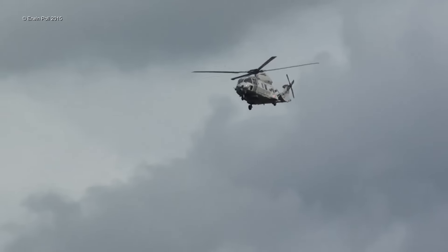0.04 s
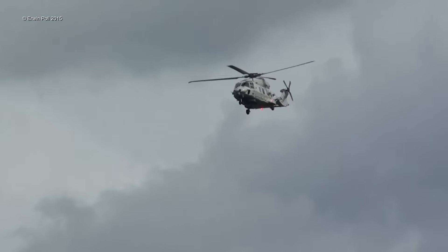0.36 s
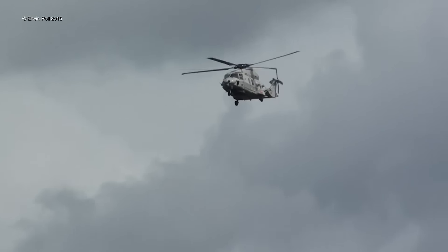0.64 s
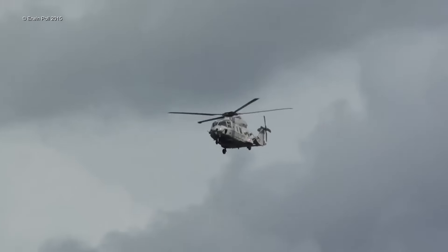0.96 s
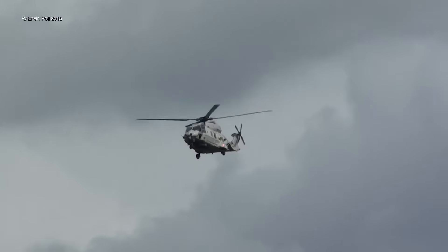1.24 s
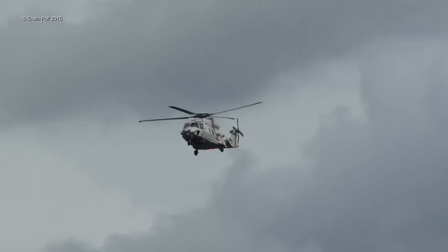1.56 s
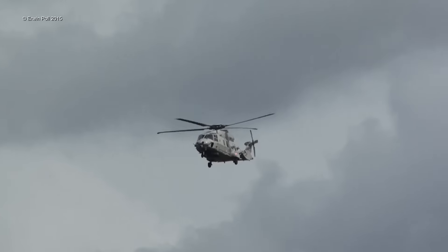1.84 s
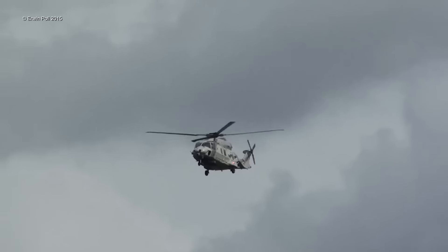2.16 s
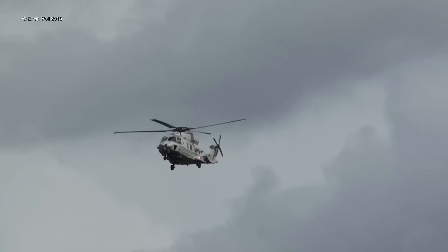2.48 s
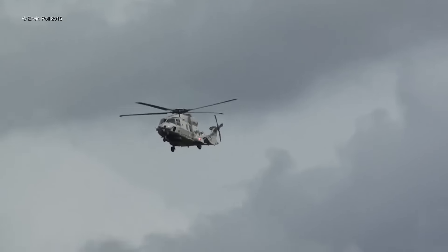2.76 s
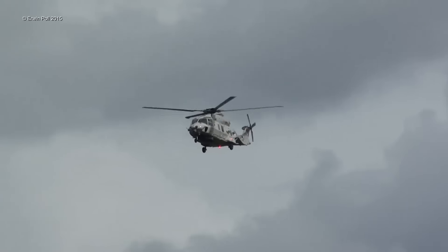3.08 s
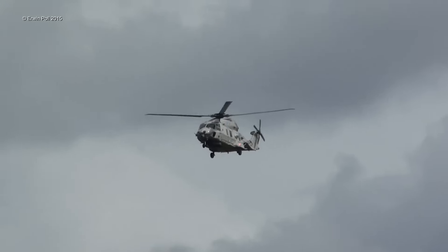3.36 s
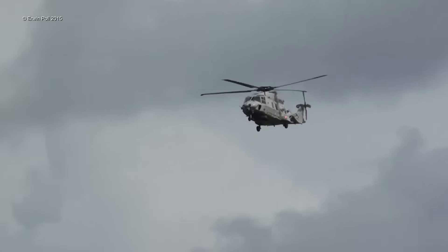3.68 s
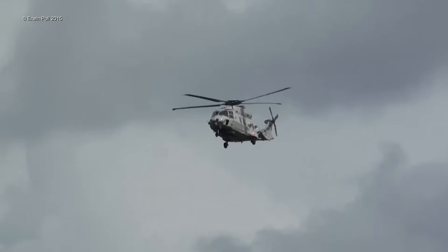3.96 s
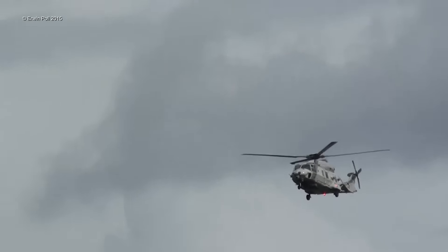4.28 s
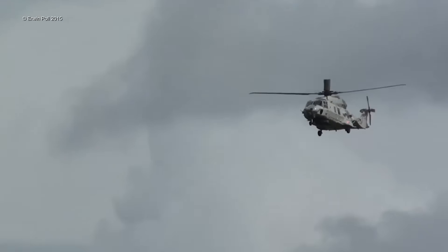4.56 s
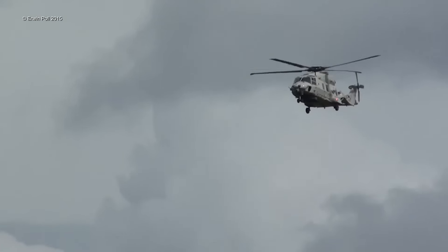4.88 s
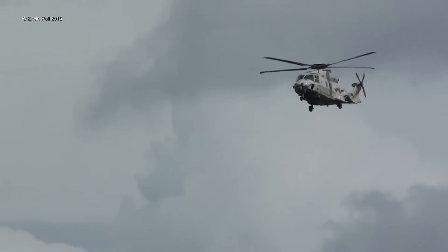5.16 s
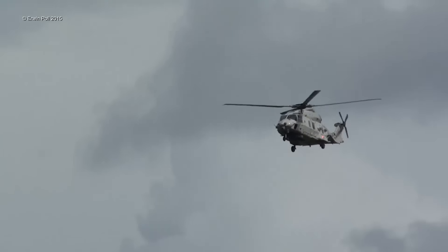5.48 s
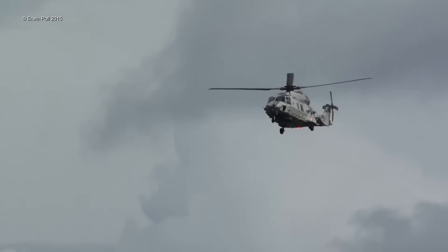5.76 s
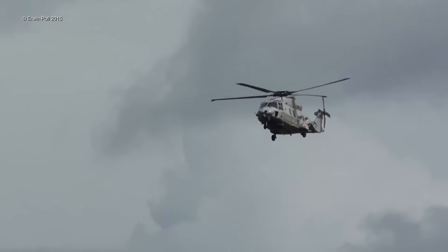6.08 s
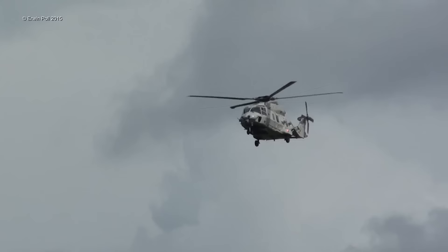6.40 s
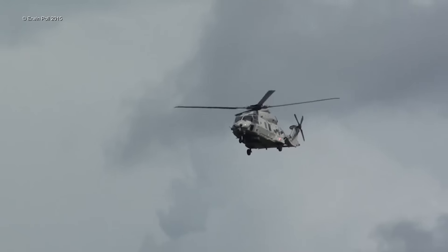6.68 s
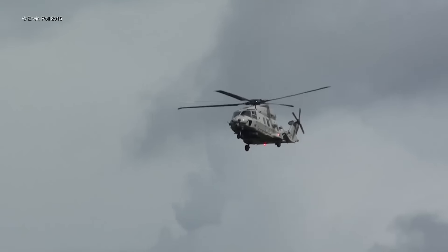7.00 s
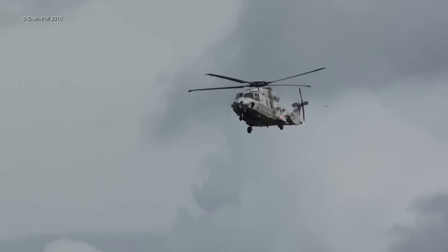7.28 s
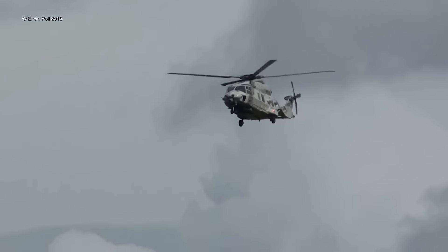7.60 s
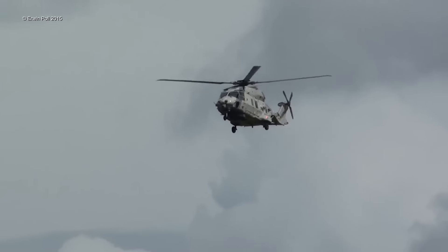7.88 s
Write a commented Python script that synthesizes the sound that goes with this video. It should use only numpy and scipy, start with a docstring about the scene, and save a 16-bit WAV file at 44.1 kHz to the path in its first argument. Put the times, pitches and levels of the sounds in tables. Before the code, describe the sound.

Rapid, loud helicopter blade slaps come in uneven waves from the sky, over a pulsing rush of air and the drone of the tail rotor. The rush builds slightly as the aircraft approaches, with brief whooshes in the second half. Low wind buffets the microphone on and off, and the hardest slaps add slight overload ticks. A thin engine whine and far birds stay very faint.

```python
"""Helicopter approaching on a gusty day.

A four-bladed main rotor slaps 19 times a second as its blades cut their own tip vortices, and
swishes as they shed turbulence. The tail rotor drones, a turbine whines faintly and far birds chirp.
Gusts rumble on a camcorder's stereo microphone; the hardest slaps tick and drive its limiter."""
import sys
import numpy as np
from scipy import signal
from scipy.fft import rfft, irfft, next_fast_len
from scipy.io import wavfile
from scipy.ndimage import uniform_filter1d, minimum_filter1d, map_coordinates

SR = 44100
rng = np.random.default_rng(int(sys.argv[2]) if len(sys.argv) > 2 else 0)


def transcribe(u):
    """Save the signal u as a 16-bit wav file named by the first command-line argument.

    u: samples, shape (n,) or (channels, n), limited to [-1, 1]; the rate is SR.
    q: integer samples, one column per channel.
    """
    v = np.clip(np.atleast_2d(u).T, -1, 1)
    q = np.round(v * 32767).astype(np.int16)
    wavfile.write(sys.argv[1], SR, q)


N = 358974
BLADE_HZ, FIRST_BLADE_S = 18.943, .054
# The hardest slaps, and one off-beat knock at 3.81 s.
# Each row: time in seconds, relative levels of the hit and of its overload tick in dB.
HARD_HITS = [(3.1168, -.5, -39), (3.2225, 1.3, -33), (3.2751, 2, -28), (3.3277, 1.5, -27), (3.38, -1, -37),
             (3.434, 1.5, -32), (3.4865, 1, -29), (3.8113, -2, -32), (5.176, 1.5, -40), (5.2292, 1, -31),
             (5.2818, .5, -31), (5.3345, .8, -31), (5.7568, 1.5, -29), (5.8095, .5, -40), (6.8655, 0, -27),
             (7.2352, 1, -28), (7.2875, 1.5, -32), (7.3403, 0, -35), (7.862, -2.5, -36)]


def undb(db):
    """Amplitude grows tenfold for every 20 dB."""
    return 10 ** (np.asarray(db) / 20)


def bell(offset, width):
    """A Gaussian pulse of height 1, whose width is its standard deviation."""
    return np.exp(-.5 * (offset / width) ** 2)


def curves(table):
    """Linear interpolation gives each column of a time table at every sample."""
    seconds, *columns = np.transpose(table)
    return [np.interp(np.arange(N) / SR, seconds, c) for c in columns]


def spectra(table):
    """Interpolation in log frequency gives each column of a frequency table at every bin."""
    hz, *columns = np.transpose(table)
    bins = np.fft.rfftfreq(next_fast_len(N), 1 / SR)
    return [np.interp(np.log(bins + 1), np.log(hz), c) for c in columns]


def shape(x, gain):
    """A linear filter multiplies each frequency bin by a gain."""
    size = next_fast_len(N)
    return irfft(rfft(x, size) * gain, size)[:N]


def noise(table):
    """Filtered white noise, rms 1, takes on the table's spectrum up to its last frequency."""
    inside = np.fft.rfftfreq(next_fast_len(N), 1 / SR) < table[-1][0]
    x = shape(rng.standard_normal(N), undb(spectra(table)[0]) * inside)
    return x / x.std()


def wander(rate_hz):
    """Random steps, smoothed twice, make a slow fluctuation of standard deviation 1."""
    hold = int(SR / rate_hz)
    steps = np.repeat(rng.standard_normal(N // hold + 2), hold)
    x = uniform_filter1d(uniform_filter1d(steps, hold), hold)[:N]
    return x / x.std()


def spells(table, rest_db, attack_s, release_s):
    """An envelope rises exponentially before each spell, holds, and decays to its resting level."""
    t, gain = np.arange(N) / SR, np.zeros(N)
    for start, length, db in table:
        away = np.maximum(start - t, 0) / attack_s + np.maximum(t - start - length, 0) / release_s
        gain = np.maximum(gain, undb(db) * np.exp(-away))
    return np.hypot(gain, undb(rest_db))


def wind(gain_db=-3.1, buffet_db=1.0):
    """Pressure fluctuations of eddies buffet the microphone; the strongest gusts crackle faintly."""
    # Gusts. Each row: start in seconds, length in seconds, relative level in dB.
    gusts = [(0, 0.079, -12.5), (.685, 0.32, -12), (1.02, 0.52, -11.5), (1.67, .33, -13), (2.08, .28, -12),
             (2.42, 0.16, -16.5), (2.635, 0.42, -9), (3.08, 0.25, -11.5), (3.42, .58, -11.5),
             (4.15, 0.2, -14.5), (5.11, .14, -12.5), (5.34, .06, -18), (5.54, 0.14, -14.5),
             (5.88, 0.023, -14), (6.02, 0.38, -12), (6.48, .05, -15.5), (6.58, 0.14, -10),
             (6.9, 0.19, -13.5), (7.2, 0.04, -9.5), (7.36, 0.055, -13.5), (7.525, 0.23, -10),
             (7.84, 0.48, -11)]
    # Wind spectra. Each row: frequency in Hz, relative density in dB.
    rumble_spectrum = [(15, -47), (30, -22), (58, -4.3), (90, -2.3), (145, -1.5), (210, -1.5), (320, -2.3),
                       (550, -17), (850, -23.5), (1400, -39.5), (4000, -66)]
    crackle_spectrum = [(2500, -12), (3800, 0), (4800, -3), (7000, -18)]
    strength = spells(gusts, rest_db=-28.5, attack_s=.036, release_s=.075)
    crackle = noise(crackle_spectrum) * strength ** 2 * undb(-46 + 7 * np.minimum(wander(900), 2.5))
    rumble = noise(rumble_spectrum) * strength * undb(gain_db + buffet_db * wander(30))
    return rumble + crackle


def propagation():
    """Rush and sizzle levels in dB climb with the approach; moving air carries them better or worse."""
    # Swells and dips. Each row: centre and width in seconds, rush gain and sizzle gain in dB.
    swells = [(1.16, 0.088, -0.5, -3), (1.53, 0.14, 1.5, -1.5), (1.98, 0.086, -1.5, -3.5),
              (2.95, .09, 1, 0), (3.2, .07, -1.5, -4.5), (4.0, 0.39, 0, -0.5), (4.66, .17, .5, 3),
              (4.94, .08, 4.5, 1.5), (5.3, 0.045, 4, 2.5), (5.63, 0.044, -0.5, 2.5), (5.9, 0.046, 5, 6),
              (6.36, 0.12, -1.5, -4), (6.55, 0.077, -1, -1.5), (6.839, 0.053, 2.5, 1),
              (7.15, 0.075, 5.5, 6), (7.5, 0.13, 1.5, 4.5), (7.8, 0.093, 2, 1.5), (8.08, 0.14, -0.5, 3)]
    t = np.arange(N) / SR
    rush_db, sizzle_db = -32.5 + .5645 * t, -36.5 + .31 * t
    for when, width, rush_gain_db, sizzle_gain_db in swells:
        swell = bell(t - when, width)
        rush_db += rush_gain_db * swell
        sizzle_db += sizzle_gain_db * swell
    return rush_db, sizzle_db


def swish(after_s, width_s, depth_db):
    """Amplitude modulation: the gain swells as each advancing tip sweeps towards the listener."""
    passes = (np.arange(N) / SR - FIRST_BLADE_S - after_s) * BLADE_HZ
    away_s = ((passes + .5) % 1 - .5) / BLADE_HZ
    gain = undb(depth_db * bell(away_s, width_s))
    return gain / np.sqrt(np.mean(gain ** 2))


def ground_reflection(x, mean_delay_s=.0018, echo_db=-16):
    """Direct and reflected sound interfere as a comb filter, whose delay shifts in the moving air."""
    delay_s = mean_delay_s * (1 + .14 * wander(4))
    echo = map_coordinates(x, [np.arange(N) - delay_s * SR], order=1, mode="mirror")
    return (x + undb(echo_db) * echo) / np.hypot(1, undb(echo_db))


def rotor_wash():
    """Blade turbulence radiates broadband noise; each pass sweeps from roar through rush to sizzle."""
    # Low, middle and high bands. Each row: frequency in Hz, relative density in dB.
    roar_spectrum = [(30, -40), (70, -24.5), (140, -3), (230, -.5), (330, 1.5), (480, -1), (620, -.5),
                     (800, -3.3), (1000, -7.5), (1250, -16), (2000, -44)]
    rush_spectrum = [(800, -3.5), (1230, -2.5), (1450, 2), (1800, 1), (2060, -5), (2600, -33), (4000, -39)]
    sizzle_spectrum = [(1700, -15), (2070, -10.5), (2200, -1.5), (2290, -.7), (2430, -6), (2600, -11.5),
                       (2950, -12), (3550, -24), (4400, -39.5), (5500, -56.5)]
    # Course of the roar. Each row: time in seconds, relative level in dB.
    roar_levels = [(0, -12.5), (.5, -19), (.9, -12.5), (1.55, -16), (2.55, -16), (2.96, -10.5), (3.2, -14),
                   (3.78, -11), (4.44, -16.5), (4.95, -12.5), (5.45, -14), (5.9, -11.5), (6.3, -11),
                   (6.52, -14.5), (7.3, -15.5), (7.6, -11), (8.14, -12.5)]
    roar_db, = curves(roar_levels)
    rush_db, sizzle_db = propagation()
    roar = noise(roar_spectrum) * swish(after_s=.004, width_s=.005, depth_db=2.5)
    roar *= undb(roar_db - 2.9 + 1.2 * wander(25))  # each band flickers in the moving air
    rush = noise(rush_spectrum) * swish(after_s=.0048, width_s=.004, depth_db=4)
    rush *= undb(rush_db - 1.5 + 1.6 * wander(60))
    sizzle = noise(sizzle_spectrum) * swish(after_s=.010, width_s=.0027, depth_db=5)
    sizzle *= undb(sizzle_db - 2 + 1.2 * wander(60))
    return roar + ground_reflection(rush + sizzle)


def tail_rotor(blade_hz=91.3, fade_db=1.8, flutter_db=1.5, yaw_db=3):
    """Harmonics of the blade-passing frequency fade separately and flutter in the main rotor's wake."""
    # Each row: harmonic number, starting level in dB, change with the approach in dB per second.
    harmonics = [(1, -36, .2), (2, -31, .2), (3, -29.5, -.3), (4, -33.5, .6), (5, -43, 0)]
    t, buzz = np.arange(N) / SR, np.zeros(N)
    phase = 2 * np.pi * np.cumsum(blade_hz * (1 + .004 * wander(12))) / SR
    for number, db, db_per_s in harmonics:
        gain = undb(db + db_per_s * t + fade_db * wander(12) + flutter_db * wander(70))
        buzz += gain * np.sin(number * phase + rng.uniform(0, 2 * np.pi))
    yaw = bell(t - 4.65, .35)  # the buzz stands out as the helicopter yaws
    return np.sqrt(2) * buzz * undb(yaw_db * yaw)


def turbine(whine_hz=3414, fade_db=3, jet_db=-61.5):
    """A thin wavering tone swells with the sizzle, over the steady jet noise of the exhaust."""
    # Exhaust hiss. Each row: frequency in Hz, relative density in dB.
    jet_spectrum = [(2500, -9), (3600, -1), (4400, -2.5), (5000, -11), (8000, -29.5)]
    phase = 2 * np.pi * np.cumsum(whine_hz * (1 + .0035 * wander(60))) / SR
    _, sizzle_db = propagation()
    whine = np.sin(phase) * undb(sizzle_db - 27.5 + fade_db * wander(9.3))
    return whine + undb(jet_db) * noise(jet_spectrum)


def background_hiss():
    """A faint broadband noise floor, turned down a little during the loudest stretches."""
    # Each row: frequency in Hz, relative density in dB.
    hiss_spectrum = [(1000, 1), (5500, .5), (9000, -.5), (13500, -1.5), (15500, -7)]
    # Each row: time in seconds, level in dB.
    hiss_levels = [(0, -59.5), (2.6, -59.5), (3.1, -63.8), (3.9, -63), (5, -60.7), (6, -59.8), (7.6, -59.5),
                   (8.1, -61.5)]
    return undb(curves(hiss_levels)[0]) * noise(hiss_spectrum)


def slap_beats():
    """Blade-vortex slaps come in bouts, once per blade: their (s, dB) pairs, joined by the hard hits."""
    # Bouts of slapping. Each row: start in seconds, length in seconds, relative level in dB.
    bouts = [(0.03, .3, -4.8), (.36, .22, -6), (.625, .34, -3), (1.1, .14, -8.5), (1.83, .09, -3.2),
             (2.2, .07, -7.5), (2.41, .04, -5.5), (2.88, .05, -5), (3.11, .28, -1.7), (3.42, .08, -2),
             (3.73, .1, -4.5), (4.15, .12, -3.5), (4.36, .24, -4.5), (4.66, .47, -2.2), (5.16, .18, -.3),
             (5.38, .13, -1.2), (5.74, .14, -2), (6.32, .3, -7.5), (6.69, .24, -3), (7.23, .12, -1.7),
             (7.48, .09, -3.5), (7.75, .14, -2.5)]
    # The vortex meets the blade early or late. Each row: time in seconds, delay in milliseconds.
    drift = [(.05, 1.7), (.25, .3), (.45, -2), (.6, -2.8), (1.05, -2.4), (1.85, 1), (2.7, 0), (3.5, 1.3),
             (3.75, -3.3), (3.92, -3.2), (4.12, .8), (4.6, 2.2), (5.4, 1.6), (5.9, 1.8), (6.7, 1.3),
             (7.35, 1.5), (7.95, -4)]
    drift_s, delay_ms = np.transpose(drift)
    level_db = 20 * np.log10(spells(bouts, rest_db=-14.5, attack_s=.045, release_s=.065))
    beats = np.arange(FIRST_BLADE_S, N / SR, 1 / BLADE_HZ)
    steady = [(b + np.interp(b, drift_s, delay_ms) / 1000, level_db[int(b * SR)]) for b in beats]
    hard = [(when, db) for when, db, _ in HARD_HITS]
    # A hard hit takes the place of a steady slap within 5 ms.
    return hard + [(when, db) for when, db in steady if all(abs(when - s) > .005 for s, _ in hard)]


def blade_slaps(gain_db=4, scatter_db=.5, jitter_ms=.2, detune=.06, rise_cycles=.48):
    """Each blade cuts one tip vortex and grazes its neighbours; each pressure pulse rings briefly."""
    # A square cut is high and ringing, a glancing one low and dull.
    # Each row: time in seconds, pitch in Hz, decay in cycles.
    cracks = [(0, 590, .65), (.45, 560, .45), (.85, 660, .9), (1.3, 560, .5), (1.85, 630, .8),
              (2.4, 620, .6), (2.85, 440, .5), (3.25, 680, .9), (3.8, 640, .7), (4.3, 510, .5),
              (4.7, 560, .55), (4.92, 490, .45), (5.02, 590, .6), (5.2, 650, 1.1), (5.5, 580, .9),
              (5.8, 660, .6), (6.3, 640, .5), (6.8, 680, .7), (7.3, 575, 1.4), (7.55, 570, 1),
              (7.8, 670, .7)]
    # Vortices met. Each row: delay after the main cut in milliseconds, gain in dB, pitch ratio.
    vortices = [(-4.6, -14, .65), (0, 0, 1), (4.2, -16, .85)]
    crack_s, crack_hz, crack_cycles = np.transpose(cracks)
    t, out = np.arange(N) / SR, np.zeros(N)
    half_beat_s = .5 / BLADE_HZ
    for when, db in slap_beats():
        hz = np.interp(when, crack_s, crack_hz)
        ring_cycles = np.interp(when, crack_s, crack_cycles)
        near = slice(*np.searchsorted(t, [when - half_beat_s, when + half_beat_s]))
        for after_ms, vortex_db, ratio in vortices:
            late, size, pitch = rng.standard_normal(3)
            delay_s = (after_ms + (after_ms != 0) * jitter_ms * late) / 1000
            cycles = (t[near] - when - delay_s) * hz * ratio * np.exp(detune * pitch)
            envelope = np.where(cycles < 0, bell(cycles, rise_cycles), np.exp(-cycles / ring_cycles))
            gain = undb(db + gain_db + vortex_db + scatter_db * size)
            out[near] -= gain * envelope * np.cos(2 * np.pi * cycles)
    # The crack carries no deep bass, and the width of the vortex core rounds it off.
    out = signal.sosfiltfilt(signal.butter(2, 120, "high", fs=SR, output="sos"), out)
    return signal.sosfiltfilt(signal.butter(6, 1100, fs=SR, output="sos"), out)


def birds(chirp_hz=4350, trill_hz=3980, trill_db=-59.5, scatter_db=2.5, detune=.012):
    """Far birds sing Gaussian tone pulses: short falling chirps and one soft, even trill."""
    # Chirps. Each row: time in seconds, peak level in dB.
    chirps = [(.733, -50), (.974, -49), (1.055, -52), (1.297, -52), (1.374, -51), (1.533, -49),
              (1.905, -50), (2.213, -52), (2.252, -50), (4.997, -42), (6.196, -46), (6.333, -48),
              (6.453, -50)]
    t, out = np.arange(N) / SR, np.zeros(N)
    notes = [(when, db, chirp_hz, 170, .0012) for when, db in chirps]
    for when in np.arange(1.5, 2.62, .037):
        notes.append((when, trill_db + scatter_db * rng.standard_normal(), trill_hz, 0, .005))
    for when, db, hz, fall_hz, width_s in notes:
        near = np.abs(t - when) < 4 * width_s
        offset_s = t[near] - when
        pitch_hz = hz * (1 + detune * rng.standard_normal()) - fall_hz * offset_s / width_s
        out[near] += undb(db) * bell(offset_s, width_s) * np.sin(2 * np.pi * np.cumsum(pitch_hz) / SR)
    return out


def whooshes(half_band_hz=160):
    """Turbulence heard as narrow-band noise swells, glides and fades."""
    # Each row: time and width in seconds, centre in Hz, glide in octaves per second, level in dB.
    glides = [(.85, .08, 780, -.6, -27), (1.5, .17, 1620, -.8, -34), (2.85, .2, 2030, 0, -38),
              (3.76, .07, 1000, 0, -29), (4.1, .07, 1650, .5, -33), (5.3, .05, 1750, 0, -29),
              (5.85, .08, 980, -.4, -24), (6.1, .12, 1400, -1, -27.5), (6.33, .05, 1520, 1, -29),
              (7.18, .08, 1630, -.6, -26.5), (7.82, .08, 1650, .6, -29)]
    t, out = np.arange(N) / SR, np.zeros(N)
    lowpass = signal.butter(2, half_band_hz, fs=SR, output="sos")
    baseband = signal.sosfilt(lowpass, rng.standard_normal(N) + 1j * rng.standard_normal(N))
    baseband /= baseband.real.std()
    for when, width_s, hz, glide, db in glides:
        near = np.abs(t - when) < 4 * width_s
        offset_s = t[near] - when
        phase = 2 * np.pi * np.cumsum(hz * 2 ** (glide * offset_s)) / SR
        band = (baseband[near] * np.exp(1j * phase)).real
        out[near] += undb(db) * bell(offset_s, width_s) * band
    return out


def overload_ticks(width_s=.0003):
    """Short broadband noise bursts tick on the hard hits, like a recorder overloading."""
    # Each row: frequency in Hz, relative density in dB.
    tick_spectrum = [(600, -10), (1500, 5), (3000, 1), (5000, -4), (7500, -10.5), (13000, -21)]
    t = np.arange(N) / SR
    bursts = sum(undb(db) * bell(t - when, width_s) for when, _, db in HARD_HITS)
    return noise(tick_spectrum) * bursts


def stereo_ports(right, decorrelation, scatter_s=.03):
    """The left port hears the midrange late and weak; scattering by the camera body lowers coherence."""
    # Left port against right. Each row: frequency in Hz, gain in dB, lag in radians, base coherence.
    response = [(40, 6.5, .05, .97), (90, 3.8, .1, .96), (190, -1, .25, .88), (340, -7, .45, .65),
                (500, -12.5, 1.2, .2), (720, -14.2, 3.87, .62), (1000, -10.5, 4.04, .85),
                (1400, -5, 4.41, .96), (2200, -1.8, 4.89, .96), (3200, -.3, 5.28, .94), (5500, 0, 6.2, .8)]
    db, lag, coherence = spectra(response)
    coherence = np.clip(coherence, .01, 1) ** decorrelation
    t = np.arange(SR // 8) / SR
    scatter = rng.standard_normal(len(t)) * np.exp(-t / scatter_s)
    scatter_phase = np.angle(rfft(scatter, next_fast_len(N)))
    direct = coherence * np.exp(-1j * lag)
    diffuse = np.sqrt(1 - coherence ** 2) * np.exp(1j * scatter_phase)
    left = shape(right, undb(db) * (direct + diffuse))
    return np.array([left, right])


def scene():
    """Helicopter, birds and wind superpose at the two ports, over a faint background hiss."""
    hits = blade_slaps() + overload_ticks()
    sound = hits + rotor_wash() + whooshes() + tail_rotor() + turbine() + birds()
    hiss = background_hiss()
    # Eddies differ more between the ports than sound from afar does.
    return stereo_ports(sound, decorrelation=.76) + stereo_ports(wind(), decorrelation=1.2) + hiss


def record(dry, threshold_db=-.6, ratio=12, hold_s=.002, fade_in_s=.004, top_hz=15400):
    """Fast peak limiting holds the slaps near full scale, and a steep low-pass cuts the top."""
    span = int(hold_s * SR)
    peak = np.abs(dry).max(axis=0) + 1e-9
    target_gain = np.minimum(1, undb(threshold_db) / peak) ** (1 - 1 / ratio)
    gain = uniform_filter1d(minimum_filter1d(target_gain, 2 * span), span)
    fade_in = np.minimum(np.arange(N) / SR / fade_in_s, 1)
    limited = np.clip(dry * gain, -1, 1) * fade_in
    return signal.sosfilt(signal.ellip(8, .2, 70, top_hz, fs=SR, output="sos"), limited)


dry = scene()
out = record(dry)
transcribe(out)
```